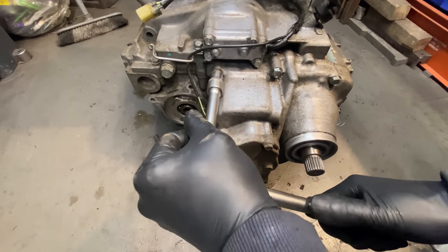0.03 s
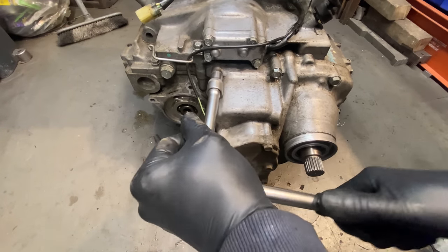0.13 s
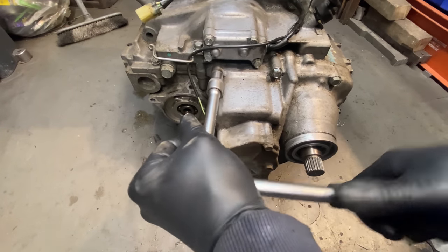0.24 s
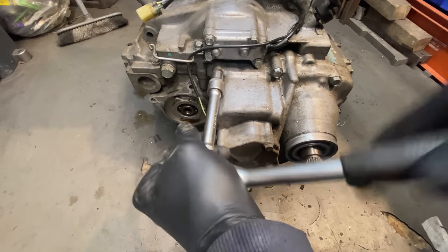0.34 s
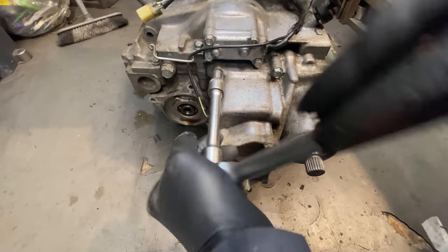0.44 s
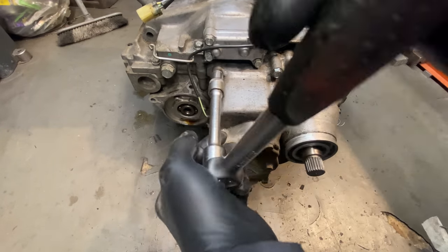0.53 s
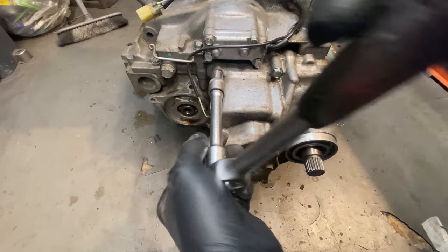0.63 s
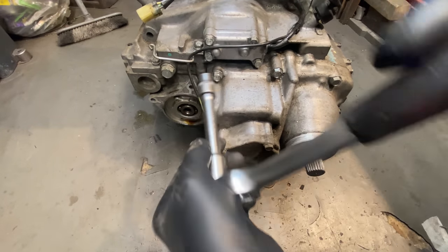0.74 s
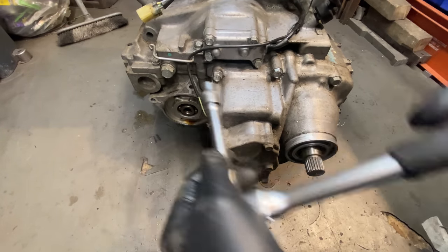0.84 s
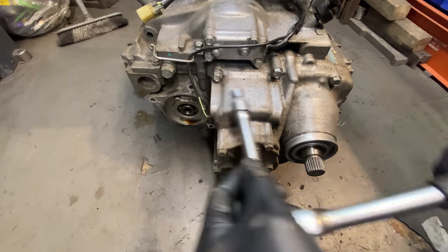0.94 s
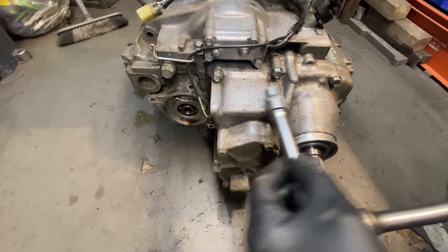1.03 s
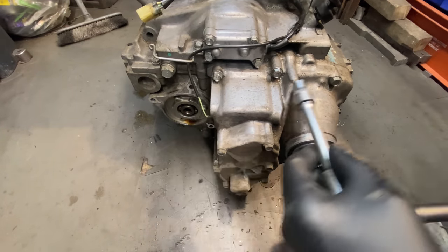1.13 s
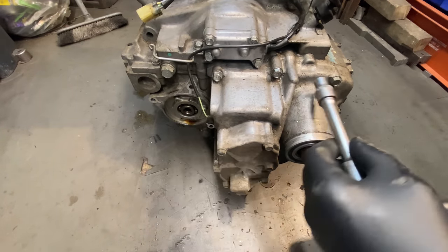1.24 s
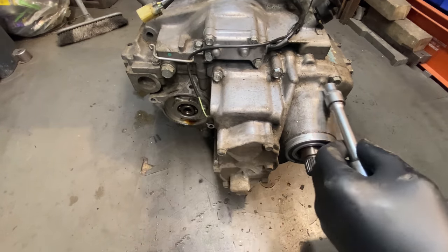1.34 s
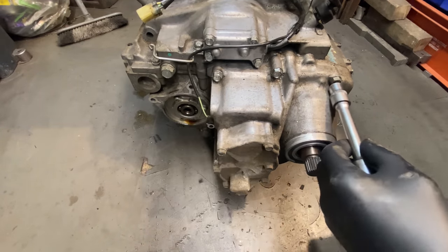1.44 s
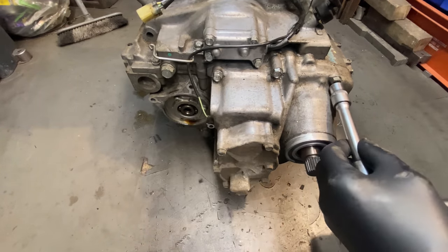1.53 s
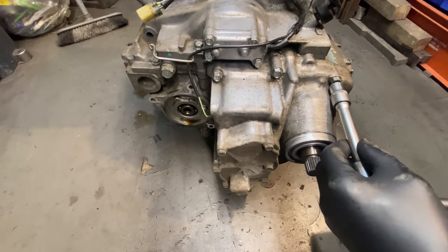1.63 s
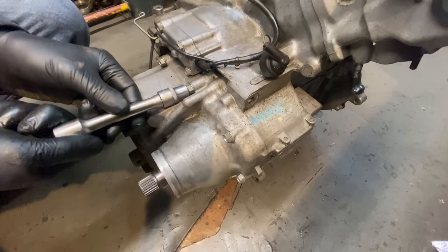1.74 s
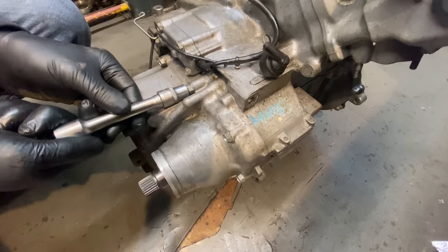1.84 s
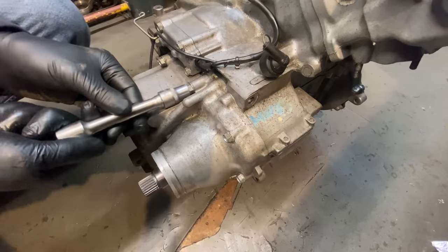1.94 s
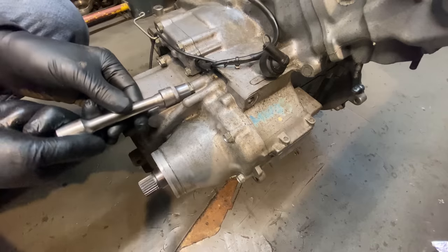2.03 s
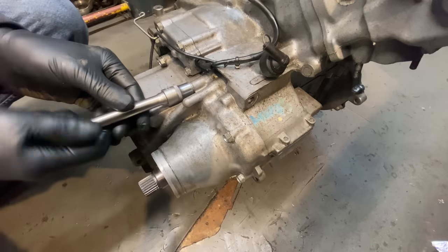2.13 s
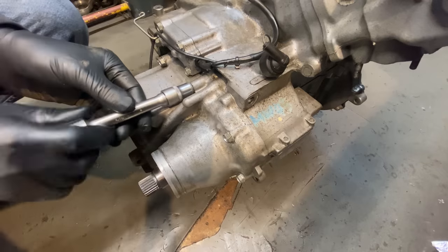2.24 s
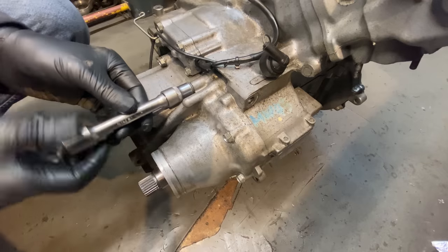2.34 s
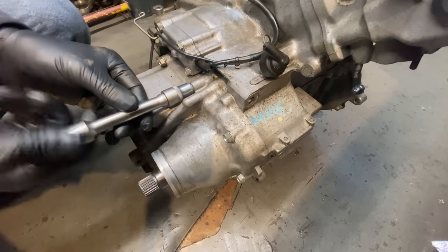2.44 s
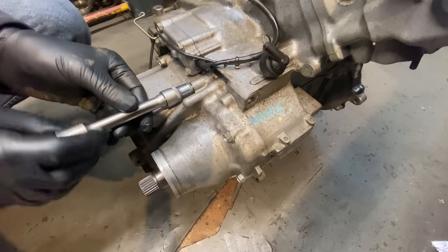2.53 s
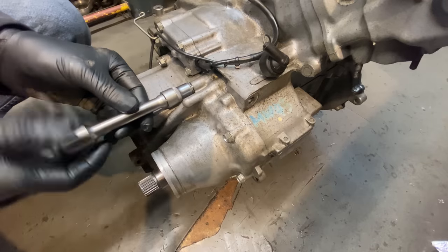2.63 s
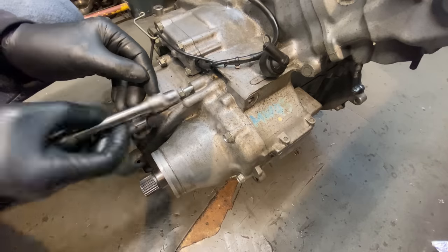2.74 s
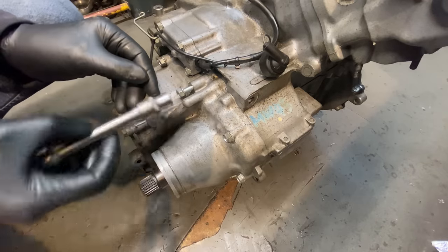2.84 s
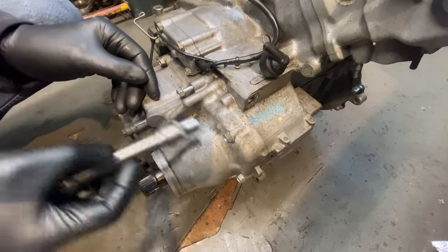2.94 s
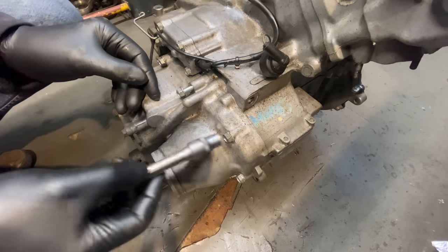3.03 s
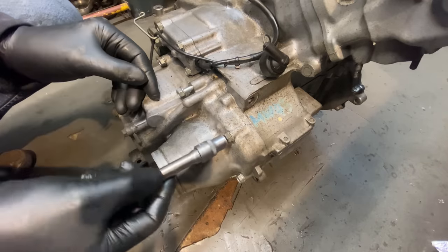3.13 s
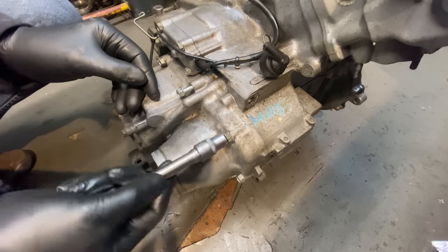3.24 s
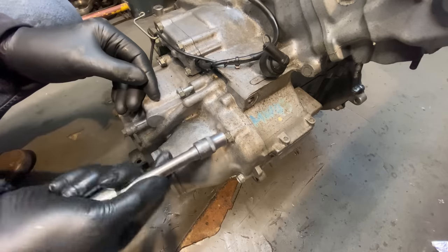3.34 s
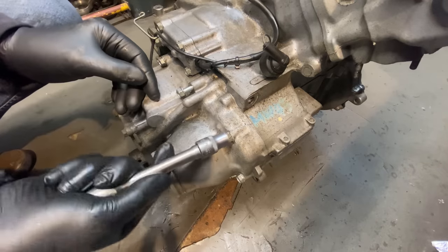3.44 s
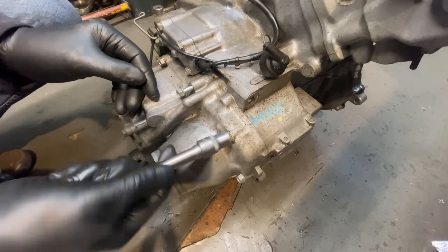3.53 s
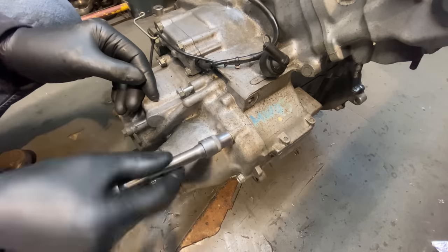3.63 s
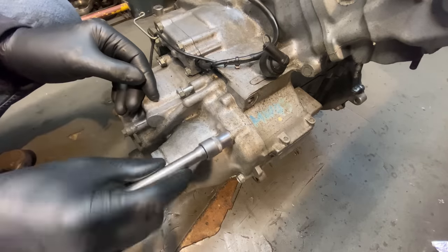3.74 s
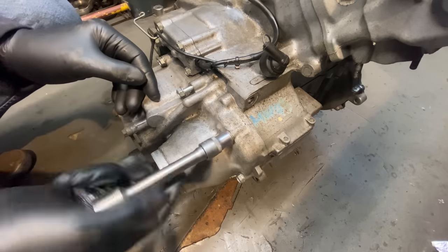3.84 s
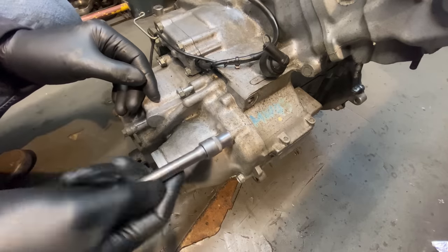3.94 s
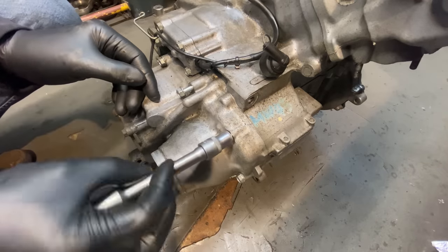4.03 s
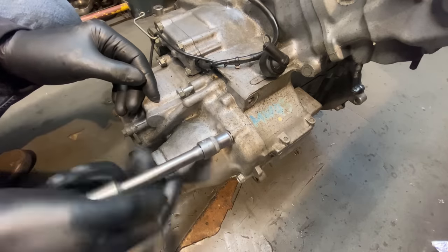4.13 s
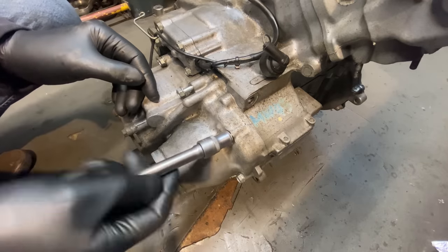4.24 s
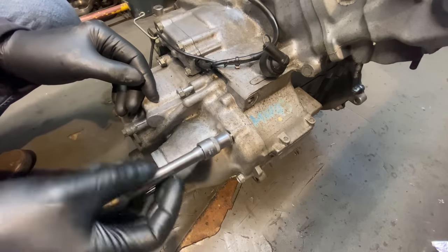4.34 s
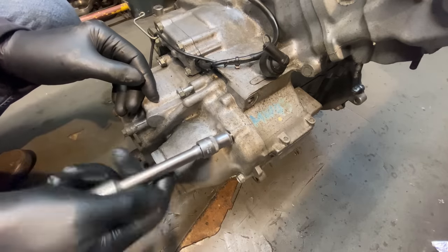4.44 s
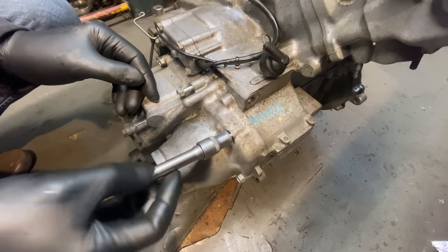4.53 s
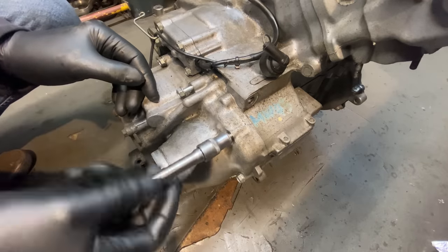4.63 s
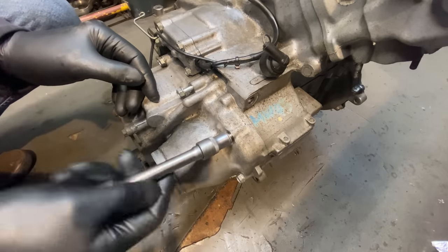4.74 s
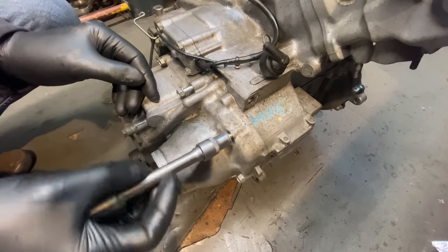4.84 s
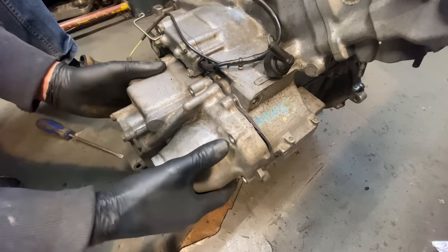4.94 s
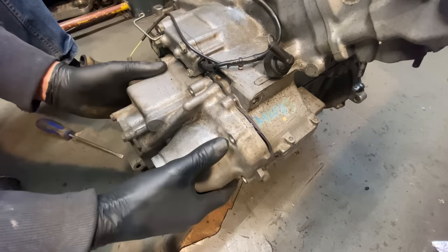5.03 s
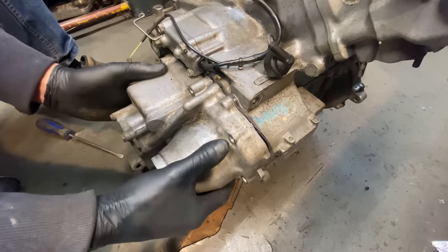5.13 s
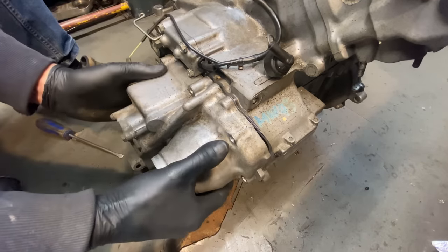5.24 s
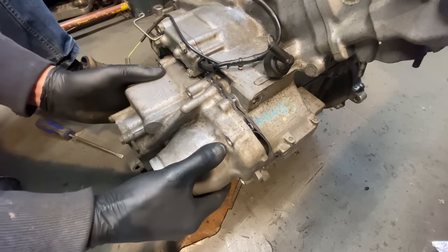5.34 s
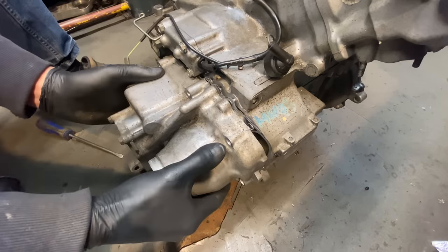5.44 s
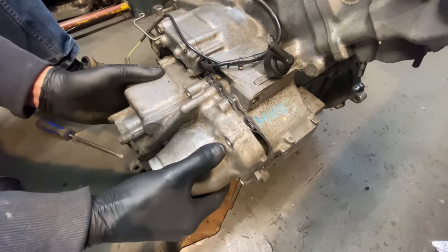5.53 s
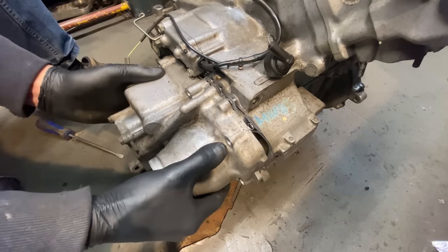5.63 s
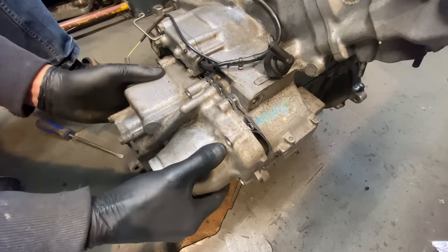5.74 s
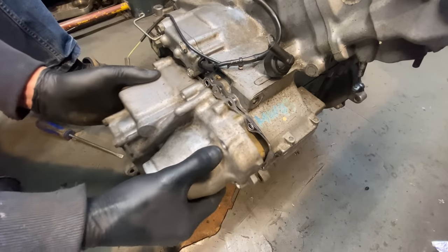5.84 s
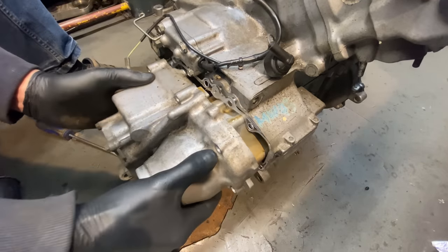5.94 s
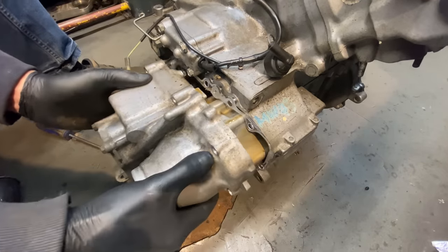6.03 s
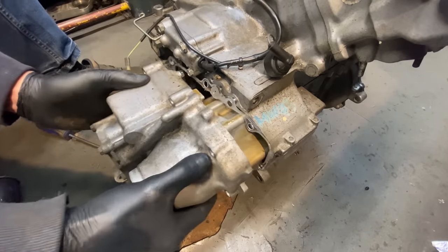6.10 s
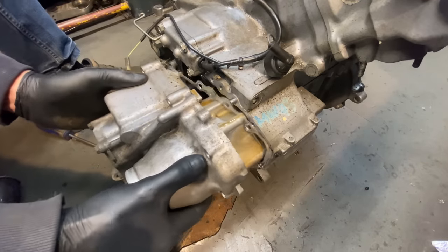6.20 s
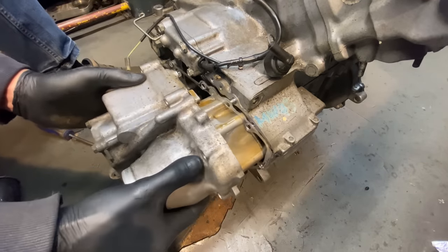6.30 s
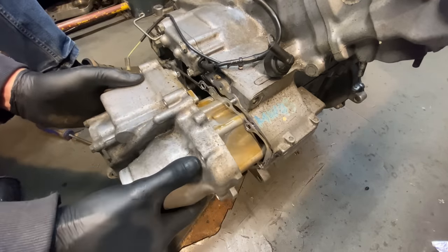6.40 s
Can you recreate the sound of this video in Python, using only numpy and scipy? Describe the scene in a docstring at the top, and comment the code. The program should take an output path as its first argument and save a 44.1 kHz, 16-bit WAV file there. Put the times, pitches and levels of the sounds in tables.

```python
"""A bolt cracks loose, then clicks, rattles and rubbing: gloved hands seat a steel socket and extension bar
on bolts and twirl them, each contact exciting resonances. Then a cast housing is pulled loose with
a knock that rings its modes, and slides off, clinking, scraping and groaning by stick-slip friction.
The garage reverberates; air noise fills it, with a faint hum for the first three seconds.
Two close microphone ports listen."""
import sys
import numpy as np
from scipy import signal
from scipy.fft import rfft, irfft, next_fast_len
from scipy.io import wavfile

SR = 44100
rng = np.random.default_rng(int(sys.argv[2]) if len(sys.argv) > 2 else 0)


def int16_out(signal):
    """Quantize to a 16-bit WAV file."""
    q = np.round(np.clip(np.atleast_2d(signal).T, -1, 1) * 32767)
    wavfile.write(sys.argv[1], SR, q.astype(np.int16))


N = 285141


def clicks():
    """Impact excitation: each contact drives broad resonances and one clink that rings on roughly."""
    # metal clicks and clinks, first the socket and bar, then the scraping housing: t/s, drive/dB,
    # hardness (treble over middle)/dB, contact time/s, ring f/Hz, clink level/dB, after-ring level/dB
    contacts = [(0.035, -20, -6, 0.0041, 6520, -36.5, -39), (0.444, -38, -6, 0.0012, 5000, -47, -68),
                (0.465, -65, -10, 0.00088, 4040, -51, -80), (0.53, -49, -20, 0.0012, 3530, -64, -75),
                (0.5525, -49, -17, 0.0019, 2710, -55, -65.5), (0.634, -48, -15, 0.0012, 2550, -55, -65),
                (0.855, -34.5, -8, 0.0043, 3560, -48, -73), (1.3007, -32, 9.5, 0.00064, 3780, -37, -67),
                (1.3018, -32, 4, 0.00093, 9660, -51, -58), (1.424, -42.5, -9, 0.0016, 1840, -62, -63),
                (1.6483, -50.5, -0.5, 0.0017, 2470, -54.5, -85), (1.909, -36, -10, 0.002, 4280, -58, -58),
                (1.9238, -21.5, -0.5, 0.00081, 4380, -27, -61), (2.0693, -44, -16, 0.0014, 4900, -42, -73),
                (2.078, -36.5, -27, 0.0028, 1060, -38, -58), (2.0878, -32, -13, 0.0021, 1150, -41, -43.5),
                (2.1516, -27, -1.5, 0.00078, 3400, -26.5, -50), (2.3849, -29, 5, 0.0036, 4190, -45, -72),
                (2.413, -46, 8, .0015, 3750, -53, -72), (2.4342, -51, 10, 0.0016, 3300, -57, -49),
                (2.451, -37, -10, 0.0014, 3520, -38, -65), (2.462, -37, -8, 0.0036, 3330, -46, -65),
                (2.673, -39, -22, 0.0015, 1500, -52, -46.5), (3.0667, -25, -8.5, 0.0022, 3100, -40, -72),
                (3.0733, -26, -5, 0.00037, 2700, -30, -43.5), (3.316, -42.5, 0, 0.0023, 3340, -48, -60),
                (3.326, -42, 6, 0.0016, 3150, -49, -67), (3.354, -46, -6, 0.003, 1150, -49, -54),
                (3.554, -42, -7, 0.0021, 3300, -44.5, -68), (3.5678, -32.5, -15, 0.00077, 3824, -42, -68),
                (3.994, -24, -3, 0.00049, 3260, -36, -43), (4.034, -44, -10, 0.00058, 2700, -40, -59),
                (4.094, -50, -4, 0.00065, 2500, -43, -60), (4.2586, -25.5, 11.5, 0.0035, 4250, -33, -83),
                (4.2631, -15.5, -4, 0.00025, 3480, -17, -55), (4.365, -45, 6, 0.0079, 4900, -55, -50.5),
                (4.5165, -38, -10, 0.002, 3180, -42, -50), (4.634, -50.5, 16, 0.0045, 4670, -46, -53.5),
                (4.751, -33.5, -1, 0.001, 3360, -36.5, -46), (4.792, -33.5, -4, 0.0011, 3320, -46, -62),
                (4.886, -46.5, 11, 0.0044, 4880, -54, -50), (5.024, -47, -4, 0.0036, 1230, -39.5, -70),
                (5.233, -42, -2, 0.0026, 2500, -58, -75), (5.2733, -25, -10, 0.0031, 1850, -28, -47),
                (5.302, -28.5, 0.5, 0.0022, 1680, -33, -48), (5.326, -41, 7.5, 0.0033, 1860, -46, -52),
                (5.5452, -43, -23, 0.002, 2080, -57, -83), (5.8618, -38, -27, 0.0045, 2420, -43, -42),
                (5.956, -58.5, 11.5, 0.0023, 1520, -64, -75), (6.014, -48, -0.5, 0.008, 1630, -60, -79),
                (6.129, -35, 9, 0.0064, 12200, -45, -36), (6.1758, -39.5, 9, 0.0067, 2790, -29.5, -50),
                (6.186, -44, 14, 0.003, 2790, -34, -37.5), (6.2149, -45.5, 18.5, 0.0018, 2740, -33, -53),
                (6.238, -54, -2, 0.0018, 2900, -51, -53), (6.287, -64, -4, 0.003, 2810, -58, -53.5)]
    # parts left singing for longer: t/s, level/dB, f/Hz, T60/s
    sings = [(0.036, -44, 6520, 0.26), (1.301, -59, 9700, 0.22), (6.19, -53, 2820, 0.57)]
    drives, clinks, t = np.zeros((3, N)), np.zeros(N), np.arange(4000) / SR
    for s, drive_db, hard_db, contact_s, hz, clink_db, after_db in contacts:
        where, noise = burst(s, contact_s)
        body_db = -5 - 0.47 * hard_db   # harder contacts shake the low body less
        drives[:, where] += from_db(drive_db + np.array([[body_db], [0], [hard_db]])) * noise
        t60 = min(6.7 * contact_s, 0.022)
        envelope = from_db(clink_db - 60 * t / t60) * (1 - np.exp(-2 * t / contact_s))
        clinks[where] += envelope * 2 * np.sin(2 * np.pi * hz * t)
        clinks += cluster(s, after_db, hz, width=0.15 * hz, t60=0.086)
    clinks += sum(cluster(s, db, hz, 0.065 * hz, t60) for s, db, hz, t60 in sings)
    thin = signal.butter(2, 680, "high", fs=SR, output="sos")   # small steel parts give little bass
    return signal.sosfilt(thin, steel(*drives)), clinks


def rubbing():
    """Sliding friction: grit and ticks drive the steel under each stroke; rasps add a bright band."""
    # faint glove rustle between strokes: t/s, level/dB
    rustle = [(0, -64.5), (.47, -64.5), (.5, -80), (1.88, -66.5), (1.92, -58), (2.73, -58.5), (2.78, -64),
              (3.05, -60.5), (3.3, -63.5), (3.45, -87), (3.6, -69.5), (4.4, -65), (4.9, -51.5),
              (4.95, -55.5), (5.4, -55.5), (5.5, -98), (6.47, -61.5)]
    # glove and steel rubbing: centre t/s, half-height length/s, level/dB, fineness (treble over middle)/dB
    strokes = [(0.306, 0.15, -58, -5.5), (0.426, 0.066, -52, -8.5), (0.876, 0.26, -62.5, -14),
               (1.93, 0.043, -51.5, -19), (2.081, 0.043, -43, -11), (2.168, 0.11, -52, -7.5),
               (2.34, 0.097, -49.5, -4), (2.485, 0.11, -49.5, -13), (2.614, 0.03, -53, -3.5),
               (2.704, 0.031, -51, -5.5), (3.082, 0.034, -47, -17.5), (3.187, 0.089, -59.5, -15),
               (3.354, 0.097, -51, -14.5), (3.534, 0.16, -52.5, -11), (3.783, 0.18, -53.5, -7),
               (3.998, 0.082, -44.5, -4), (4.088, 0.068, -53, -4), (4.125, 0.037, -54, 10.5),
               (4.201, 0.071, -50, -8.5), (4.28, 0.053, -40, -8), (4.355, 0.066, -52, -0.5),
               (4.526, 0.12, -47, -7.5), (4.636, 0.03, -52.5, -14.5), (4.745, 0.052, -44.5, -6),
               (4.792, 0.039, -53.5, -7), (4.953, 0.048, -53, -24.5), (5.035, 0.064, -53, -23.5),
               (5.183, 0.52, -71, -37), (5.555, 0.17, -58.5, -6), (5.795, 0.36, -55.5, -19),
               (5.882, 0.12, -57, -35.5), (6.03, 0.01, -54, -23), (6.101, 0.044, -51.5, -1.5),
               (6.147, 0.035, -39.5, -8.5), (6.196, 0.062, -38, -6), (6.272, 0.071, -50, -17)]
    # the socket rasps over a bolt head: centre t/s, half-height length/s, level/dB
    rasps = [(0.434, 0.034, -51.5), (2.328, 0.028, -50), (4.121, 0.035, -56)]
    ticks_per_s, tick_share, tick_limit_db = 220, 0.17, -44   # the loose socket ticks on the bolt
    levels = from_db(in_time(rustle)[0] + np.array([[-22], [0], [-7]]))   # low, middle, treble
    for centre_s, length_s, rub_db, fine_db in strokes:
        near, shape = swell(centre_s, length_s)
        drag_db = -9 - 0.83 * fine_db   # coarse strokes drag dully, fine ones hiss
        levels[:, near] += from_db(rub_db + np.array([[drag_db], [0], [fine_db]])) * shape
    rasp_level = np.zeros(N)
    for centre_s, length_s, rasp_db in rasps:
        near, shape = swell(centre_s, length_s)
        rasp_level[near] += from_db(rasp_db) * shape
    low, middle, treble = levels * from_db([2.55 * drift(48.0) for _ in range(3)])
    grains = 0.62 * grit(per_s=6000, spread_db=1.5)
    ticks = tick_share * np.minimum(middle, from_db(tick_limit_db)) * grit(ticks_per_s, 1.54)
    friction = grains + 0.16 * rng.standard_normal((2, N))   # part of it differs at each port
    rasp = rasp_level * rms_one(band(friction + grit(ticks_per_s, 2.0), 4010, 6070))
    return steel(low * friction, middle * friction + ticks, treble * friction + ticks / 2) + rasp


def steel(low, middle, treble):
    """Forced response: each of three drives passes through the tool's resonances in its range."""
    # broad resonances of tool and gloves: f/Hz, least bandwidth/Hz, gain/dB
    resonances = [(356, 366, 1), (1130, 800, 3), (2093, 910, 1.5), (2800, 310, -1.5), (3426, 460, -0.5),
                  (4350, 920, -3.5), (6040, 1850, -8.5), (9360, 3150, -2.5), (9740, 625, 4.5),
                  (11020, 1650, 3.5), (13420, 660, -1.5), (16650, 470, 11.5)]
    out = 0
    for k, (hz, width, gain_db) in enumerate(resonances):
        width = max(width, .2 * min(hz, 4500))
        drive = low if hz < 1500 else middle if hz < 7500 else treble
        out = out + (-1) ** k * from_db(gain_db) * band(drive, hz - width / 2, hz + width / 2)
    return out


def housing():
    """Modal vibration: each jolt rings the casting and its walls, with a crack above and a thud below."""
    # sharp cracks and knocks in time order; a bolt cracks loose, later the housing is knocked:
    # t/s, blow/dB, crack/dB, floor thud/dB
    jolts = [(0.035, -83, -13, -70.5), (5.024, -86, -42, -91), (5.197, -74.5, -61, -75),
             (5.268, -40, -16.5, -31.5), (5.2714, -43.5, -23, -40), (5.277, -44, -29, -63),
             (5.294, -52.5, -39, -49), (5.856, -54.5, -66, -61), (5.938, -58, -42, -45.5),
             (5.985, -62.5, -70, -56.5), (6.215, -61.5, -37, -60), (6.446, -61.5, -79, -46)]
    # modes of the casting: f/Hz, gain/dB, T60/s
    modes = [(150.3, 9, 0.63), (194.5, 12, 0.11), (279, 9, 0.08), (360.4, 8.5, 0.079), (420, 10.5, 0.12),
             (547, 18, 0.053), (662, 12.5, 0.082), (906, 4.5, 0.17), (984, 11.5, 0.13), (1117, 9, 0.1),
             (1209, 11.5, 0.062), (1315, 4.5, 0.16), (1706, 3.5, 0.21), (1904, 4.5, 0.26),
             (1912, 1.5, 0.18)]
    # clusters of close modes in its walls: f/Hz, bandwidth/Hz, level re blow/dB, T60/s
    wall_modes = [(241, 160, 9, 0.23), (414, 380, 15.5, 0.15), (1055, 590, 13, 0.14), (1750, 1080, 4, 0.26)]
    # modes of the floor under it: f/Hz, gain/dB, T60/s
    floor_modes = [(62, -39.5, 0.56), (93.2, -46, 0.54), (127.5, -36, 0.31)]
    contact_s, spot_spread_db = 0.00328, 2
    blows, crack, thud, walls = np.zeros((4, N))
    for s, blow_db, crack_db, thud_db in jolts:
        where, noise = burst(s, contact_s)
        blows[round(s * SR) + 1] = from_db(blow_db)
        crack[where] += from_db(crack_db) * noise
        thud[round(s * SR)] = from_db(thud_db)
        free_s = s + contact_s
        walls += sum(cluster(free_s, blow_db + db, hz, width, t60) for hz, width, db, t60 in wall_modes)
        walls += cluster(free_s, crack_db - 26.5, hz=3570, width=3600, t60=0.32)   # wash after the crack
    latest = np.searchsorted(np.array(jolts)[:, 0], np.arange(N) / SR) - 1
    # each jolt acts on another spot and so weights the modes anew
    weights = from_db(rng.normal(0, spot_spread_db, (len(jolts), len(modes))))
    rings = [(-1) ** k * from_db(db) * ring(blows * weights[latest, k], hz, t60)
             for k, (hz, db, t60) in enumerate(modes)]
    # two resonators in series: a heavy slab builds up slowly
    floor = sum(from_db(db) * ring(ring(thud, hz, t60), hz, 0.043) for hz, db, t60 in floor_modes)
    return sum(rings[2:]) + band(crack, 1340, 3200), floor + rings[0] + rings[1], walls


def groan():
    """Stick-slip friction rocks the casting at one low wavering pitch, in lurches that swell and die."""
    # lurches of the housing on its dowels: peak t/s, level/dB
    lurches = [(5.303, -28.5), (5.741, -57), (5.8, -52), (5.879, -36.5), (5.953, -35), (6.008, -34.5),
               (6.076, -40), (6.186, -46.5), (6.235, -43.5), (6.267, -43.5), (6.46, -47.5)]
    pitch_hz, rise_db_per_s, fall_db_per_s = 173.3, 721, 494
    t = np.arange(N) / SR
    phase = 2 * np.pi * np.cumsum(pitch_hz * (1 + 0.0256 * drift(15.6))) / SR
    level = sum(from_db(db + np.minimum(rise_db_per_s * (t - s), fall_db_per_s * (s - t)))
                for s, db in lurches)
    return np.sqrt(2) * level * np.sin(phase)


def pops():
    """Cavity resonance: a small, heavily damped hollow sounds for a few cycles."""
    # soft rubbery pops: t/s, peak level/dB, f/Hz
    cavities = [(1.788, -36, 530), (1.813, -43, 660)]
    out = np.zeros(N)
    for s, peak_db, hz in cavities:
        blow = np.zeros(N)
        blow[round(s * SR)] = from_db(peak_db)
        out += ring(blow, hz, t60=11.0 / hz)
    return band(out, 310, 2500)


def bumps():
    """Band-limited noise: short swells, each round its own pitch, sound as dull thumps and scuffs."""
    # the opening click's low thump, then handling bumps: centre t/s, half-height length/s, level/dB, f/Hz
    thumps = [(0.052, 0.022, -51.5, 119), (3.377, 0.073, -64.5, 410), (3.547, 0.062, -60.5, 330),
              (4.19, 0.09, -63.5, 244.7), (4.952, 0.051, -52.5, 870)]
    edge_ratio = 1.35
    out, white = np.zeros(N), rng.standard_normal(N)
    for centre_s, length_s, db, hz in thumps:
        near, shape = swell(centre_s, length_s)
        out[near] += from_db(db) * shape * rms_one(band(white[near], hz / edge_ratio, hz * edge_ratio))
    return out


def ports(x):
    """Spaced receivers: near sound reaches the two ports with phase and level gaps that vary with pitch."""
    # level gap: f/Hz, left over right/dB
    level_gap = [(100, -29.5), (350, 4.5), (650, 7), (1500, 0.5), (5000, 8.5), (10000, -1), (14000, 0)]
    # phase gap: f/Hz, lead of the left port/rad
    phase_gap = [(0, 5), (250, 1.4), (600, 2.5), (1500, 2), (5000, 1.64), (10000, 1.28), (13000, -2.5),
                 (22050, 38)]
    size = next_fast_len(N + 2000)
    hz = np.arange(1, size // 2 + 2) * SR / size
    lead = np.interp(hz, *np.transpose(phase_gap))
    left = from_db(at_hz(level_gap, hz) / 2) * np.exp(.5j * lead)
    return irfft(rfft(x, size) * [left, 1 / left], size)[:, :N]


def garage(x):
    """Diffuse reverberation: each port gets its own dense tail of reflections, the treble dying first."""
    # decay bands of the room: lower f/Hz, upper f/Hz, T60/s, relative level/dB
    decays = [(203, 503, 0.31, -7.5), (487, 1710, 0.27, -9.5), (2740, 7370, 0.18, -4.5),
              (8000, 10200, 0.051, -7)]
    t = np.arange(SR // 2) / SR
    white = rng.standard_normal((2, len(t))) * (1 - np.exp(-t / 0.00018))
    tail = sum(from_db(db - 21.0 - 60 * t / t60) * band(white, low, high) for low, high, t60, db in decays)
    return signal.fftconvolve(x[None], tail, axes=1)[:, :N]


def air():
    """Partly coherent noise: half-octave bands of room air waver, each partly alike at the two ports."""
    # course of the background noise, in relative levels: t/s, upper band/dB, low middle/dB, rumble/dB
    course = [(0, 6.5, 3, -1.5), (3.0, 9, 5, 4.5), (3.2, 3.5, 0.5, 0), (4.9, 3.5, -17, 4), (4.94, 2, 0, -1),
              (6.47, 1.5, 5, 9)]
    # its spectrum: f/Hz, relative spectral density/dB
    colour = [(15, -38), (25, -31.5), (55, -1.5), (105, -13), (146, -10), (259, -15.5), (726, -25.5),
              (952, -26.5), (8830, -47), (10700, -59), (13600, -31.5), (16500, -69)]
    # likeness of the two ports: f/Hz, correlation
    likeness = [(60, 0.87), (180, 0.89), (550, 0.83), (1650, 0.23), (4970, 1), (15000, 0.49)]
    first_second_db, rumble_top_hz, middle_top_hz = -66, 300, 1000
    upper_db, middle_db, rumble_db = in_time(course)
    rumble_db = rumble_db + 1.15 * drift(5)   # the rumble bands also waver together
    out, edges = 0, 24 * 2 ** np.arange(0, 9.6, .5)
    white = rng.standard_normal((2, 2, N))
    for k, (low, high) in enumerate(zip(edges, edges[1:])):
        mid, side = band(white[k % 2], low, high)
        hz = np.sqrt(low * high)
        alike = np.clip(at_hz(likeness, hz), -1, 1)
        course_db = upper_db if hz > middle_top_hz else middle_db if hz > rumble_top_hz else rumble_db
        waver_db = (1.55 if hz > rumble_top_hz else 3.5) * drift(16.0)
        gain = from_db(at_hz(colour, hz) + course_db + waver_db)
        out = out + gain * (np.sqrt(1 + alike) * mid + np.sqrt(1 - alike) * side * [[1], [-1]])
    return from_db(first_second_db) * out / np.sqrt(np.mean(out[:, :SR] ** 2))


def hum():
    """Amplitude and phase modulation: two faint low partials waver at random, then fade quickly."""
    # partials of the hum: f/Hz, relative level/dB
    partials = [(144, -6.5), (192, -13)]
    level_db, stop_s, fade_db_per_s = -60.5, 3.0, 300
    t = np.arange(N) / SR
    tone = sum(from_db(db + 1.4 * drift(5.9)) * np.sin(2 * np.pi * hz * t + 1.14 * drift(2.3))
               for hz, db in partials)
    return from_db(level_db - fade_db_per_s * np.maximum(t - stop_s, 0)) * tone


def burst(s, length_s):
    """Rough contact: micro-impacts build quickly and die away; gives their place and their noise."""
    age = np.arange(4000) / SR / max(length_s, 2e-4)
    at = round(s * SR)
    noise = rng.choice([-1, 1], len(age)) * np.exp(-age ** 1.1) * (1 - np.exp(-3 * age))
    return slice(at, at + len(age)), noise[:N - at]


def ring(x, hz, t60):
    """Damped resonator: a unit impulse starts a decaying sine of height 1."""
    r, w = from_db(-60 / (t60 * SR)), 2 * np.pi * hz / SR
    return signal.lfilter([0, np.sin(w)], [1, -2 * r * np.cos(w), r * r], x + 1e-18)


def cluster(start_s, level_db, hz, width, t60):
    """Modal overlap: many beating modes sound like a band of noise dying away."""
    out, at = np.zeros(N + SR), round(start_s * SR)
    t = np.arange(round(min(t60, .5) * SR)) / SR
    noise = rms_one(band(rng.standard_normal(len(t)), hz - width / 2, hz + width / 2))
    out[at:at + len(t)] = from_db(level_db - 60 * t / t60) * noise
    return out[:N]


def swell(centre_s, length_s):
    """Raised-cosine envelope: the samples of one stroke and its rise and fall."""
    near = np.arange(max(round((centre_s - length_s) * SR), 0), min(round((centre_s + length_s) * SR), N))
    return near, np.cos(np.pi / 2 * (near / SR - centre_s) / length_s) ** 2


def grit(per_s, spread_db):
    """Shot noise: random grains of uneven size, rms 1."""
    sizes = from_db(spread_db * np.minimum(rng.exponential(1, N), 5)) * (rng.random(N) < per_s / SR)
    return rms_one(sizes * rng.choice([-1, 1], N))


def drift(corner_hz):
    """Low-passed noise: a slow random wander of rms 1."""
    step = 40   # samples between points
    r = np.exp(-2 * np.pi * corner_hz * step / SR)
    slow = signal.lfilter([1], [1, -2 * r, r * r], rng.standard_normal(N // step + 2002))[2000:]
    return np.interp(np.arange(N) / step, np.arange(len(slow)), rms_one(slow))


def band(x, low_hz, high_hz):
    """Butterworth band-pass."""
    return signal.sosfilt(signal.butter(2, [low_hz, high_hz], "band", fs=SR, output="sos"), x)


def in_time(rows):
    """Table columns as curves over all samples."""
    s, *columns = np.transpose(rows)
    return [np.interp(np.arange(N) / SR, s, c) for c in columns]


def at_hz(points, hz):
    """A spectrum interpolated over log frequency."""
    return np.interp(np.log(hz), np.log(np.array(points)[:, 0]), np.array(points)[:, 1])


def from_db(db):
    """Decibels to gain."""
    return 10 ** (np.asarray(db) / 20)


def rms_one(x):
    """Scale to rms 1."""
    return x / np.sqrt(np.mean(x ** 2) + 1e-20)


def scene():
    """Superposition: tool, housing and gloves in the room; the deepest sounds reach both ports alike."""
    jolts, deep, walls = housing()
    snaps, clinks = clicks()
    hits = snaps + jolts + pops()
    near = ports(hits + clinks + walls + rubbing())
    centred = groan() + bumps() + band(deep, 79, 450)
    dip_s, dip_half_s, dip_db = 4.917, 0.017, -24.5   # the whole level dips for an instant
    dip = from_db(dip_db * np.clip(1 - abs(np.arange(N) / SR - dip_s) / dip_half_s, 0, 1))
    return dip * (near + centred + garage(hits) + air() + hum())


def record(dry):
    """Band limiting: a steep low-pass cuts the top."""
    stopband_hz = 16600
    return signal.sosfilt(signal.cheby2(12, 70, stopband_hz, fs=SR, output="sos"), dry)


dry = scene()
out = record(dry)
int16_out(out)
```